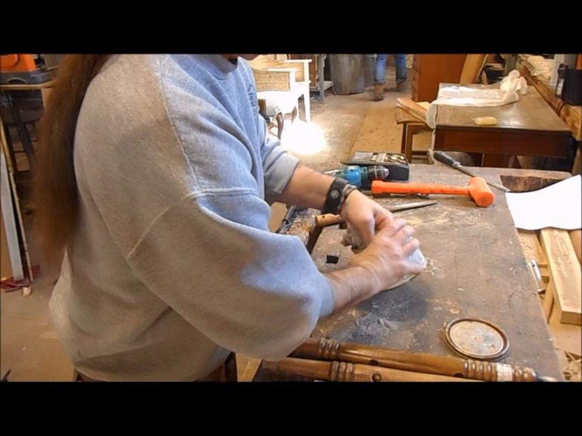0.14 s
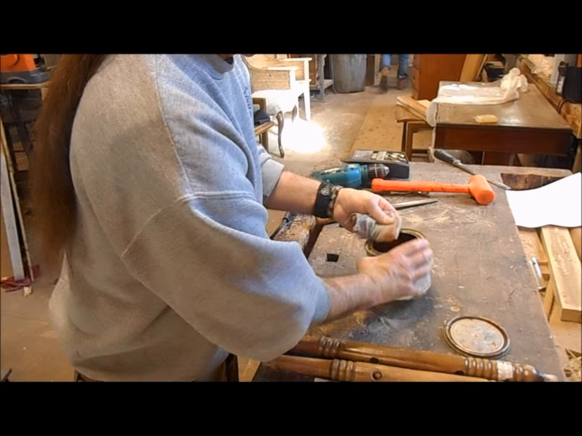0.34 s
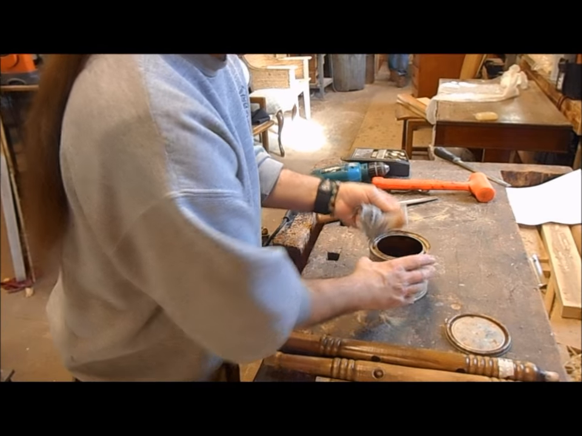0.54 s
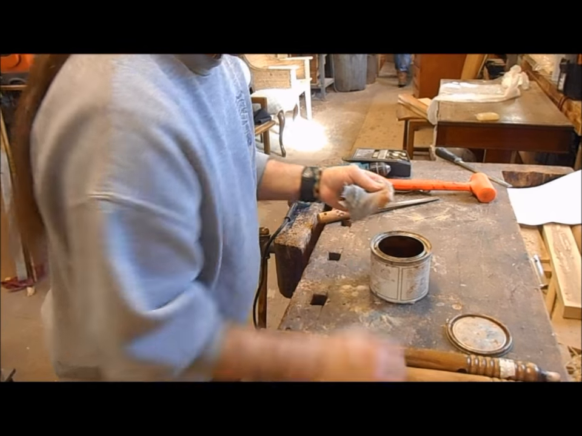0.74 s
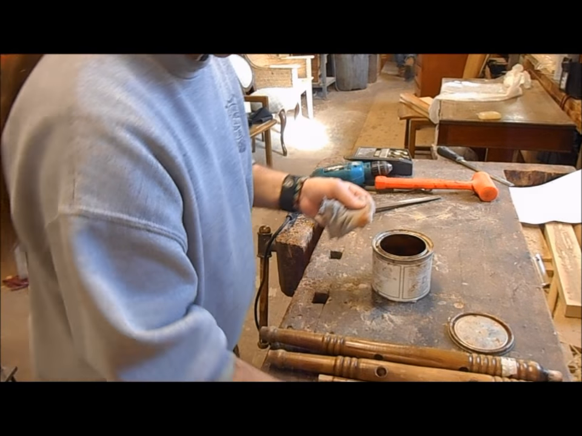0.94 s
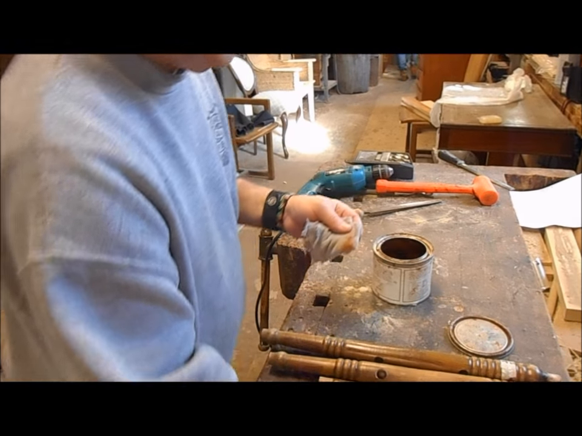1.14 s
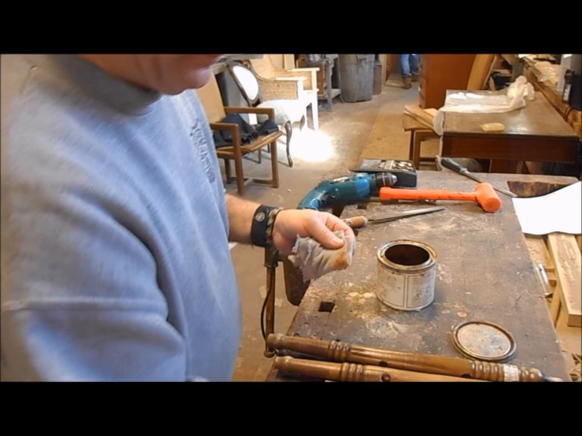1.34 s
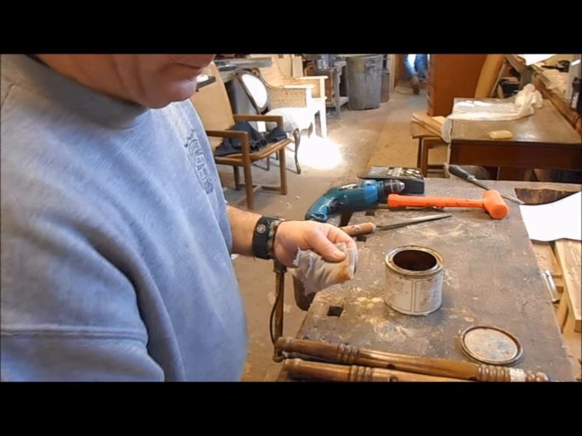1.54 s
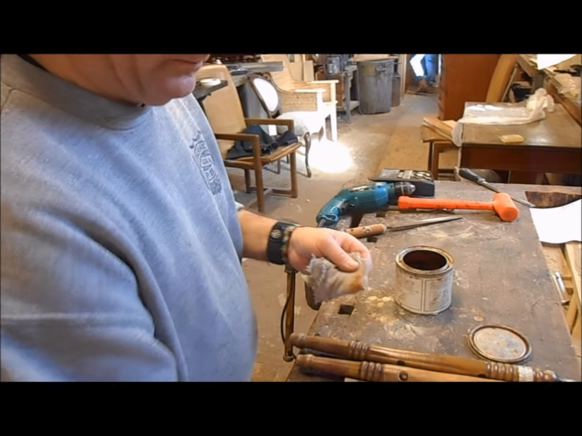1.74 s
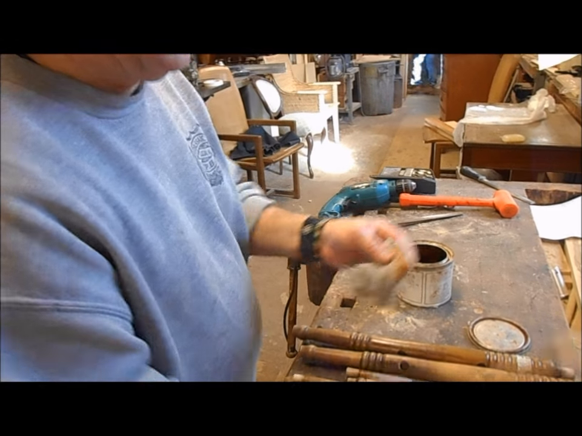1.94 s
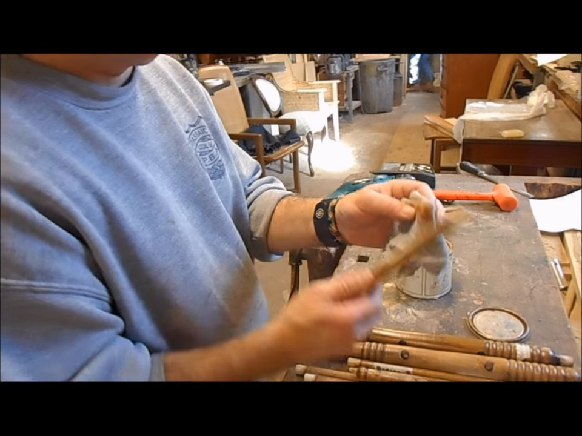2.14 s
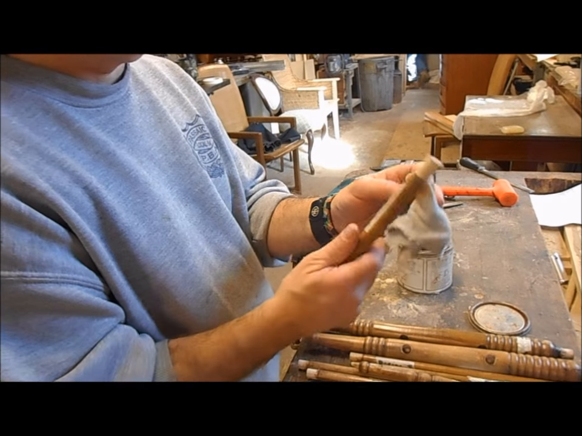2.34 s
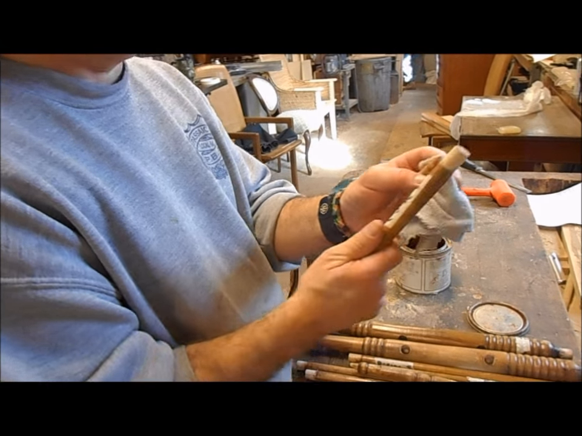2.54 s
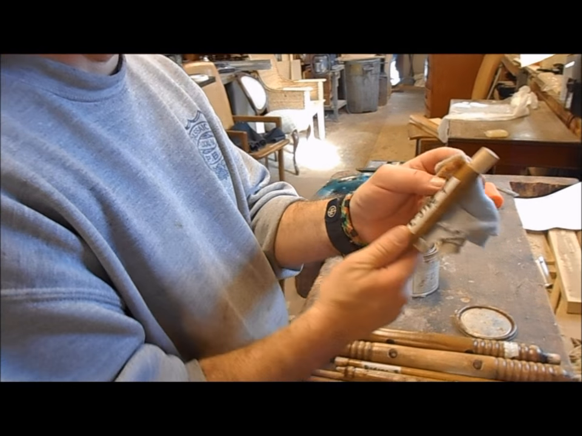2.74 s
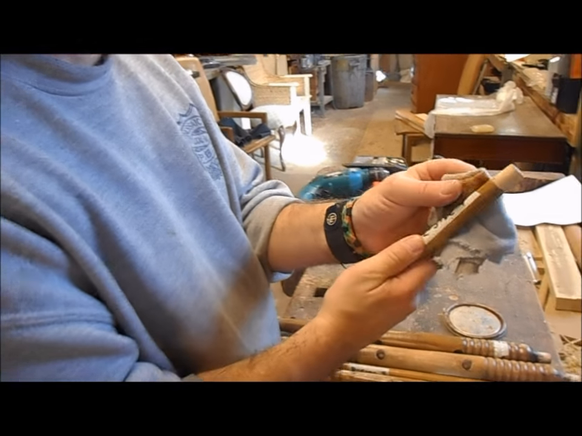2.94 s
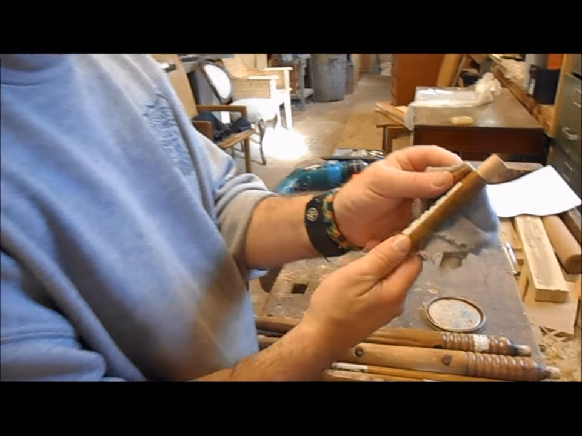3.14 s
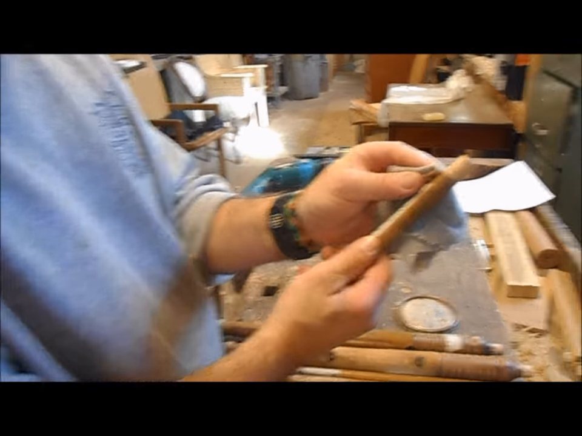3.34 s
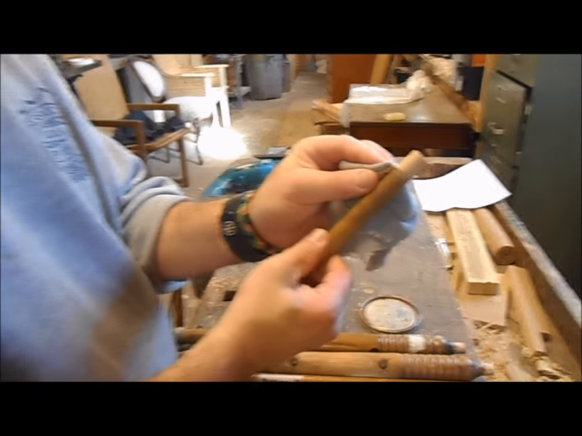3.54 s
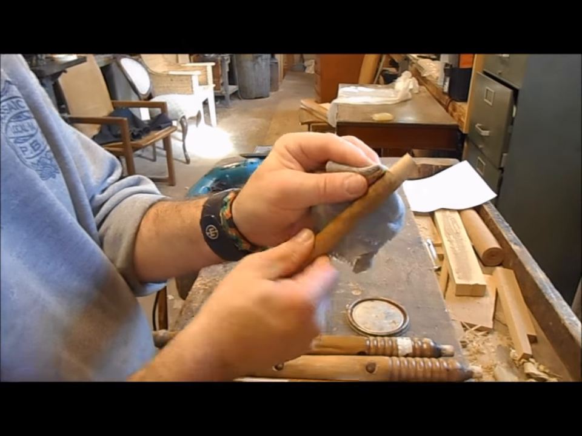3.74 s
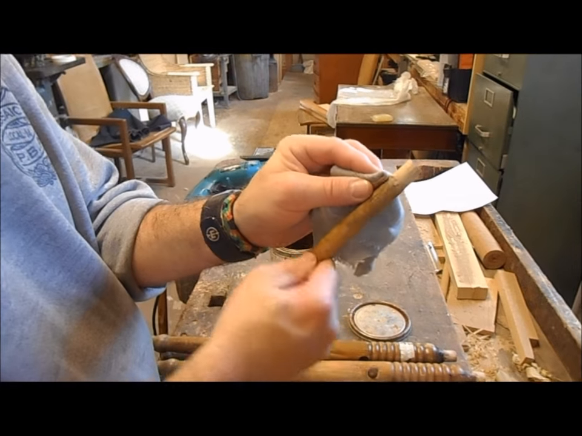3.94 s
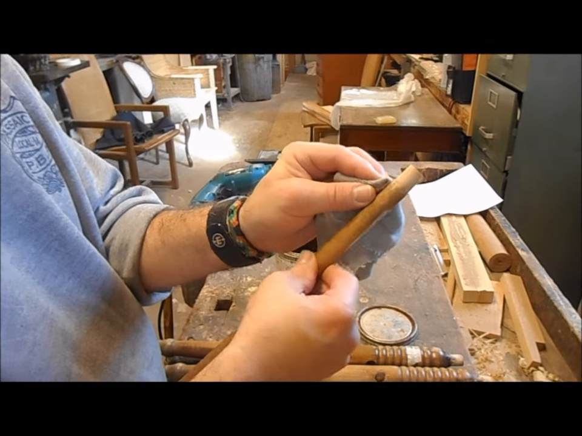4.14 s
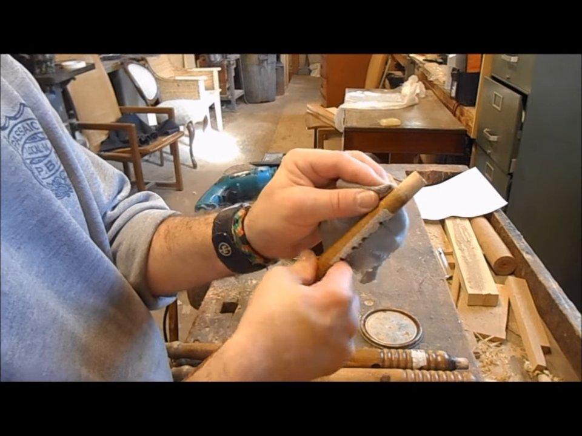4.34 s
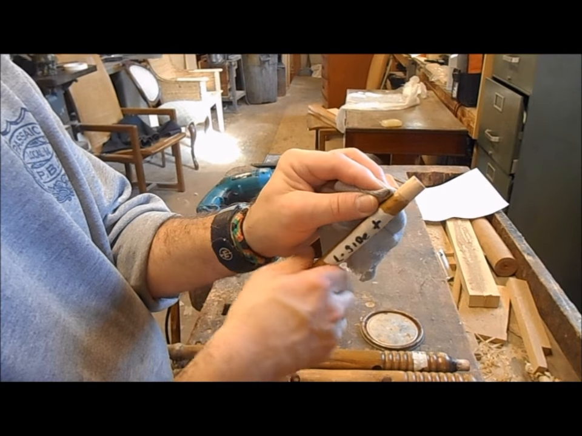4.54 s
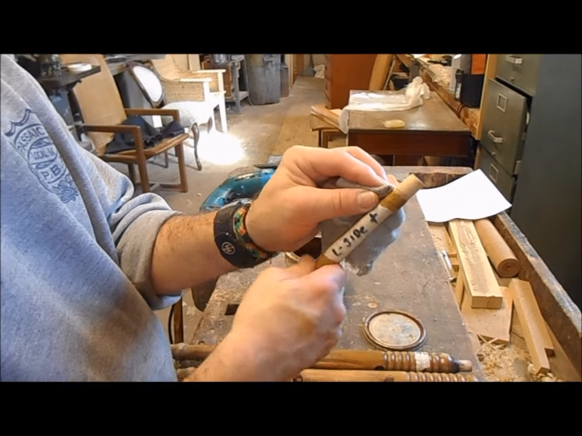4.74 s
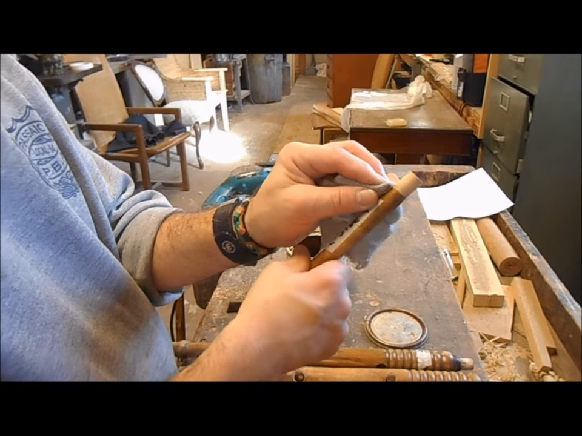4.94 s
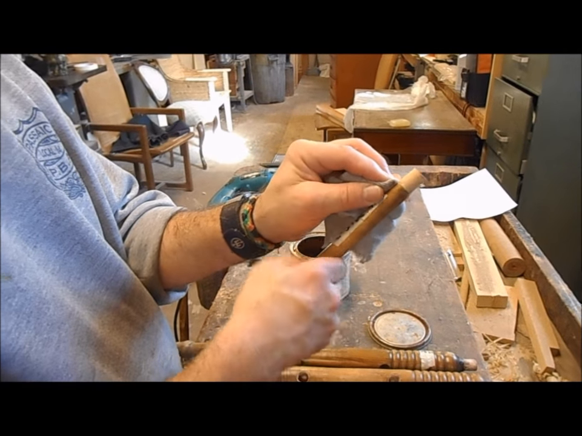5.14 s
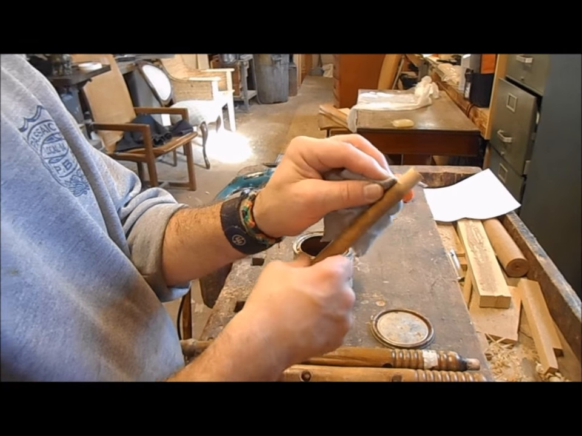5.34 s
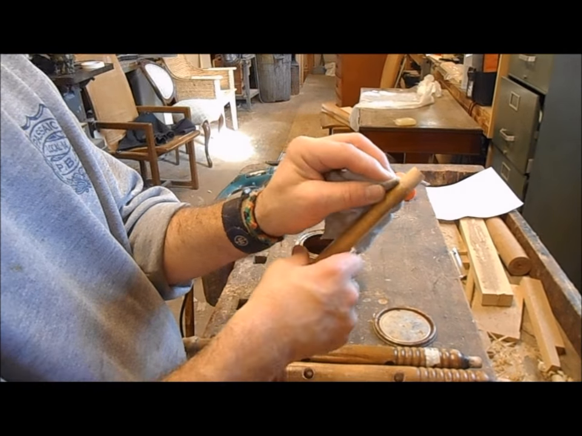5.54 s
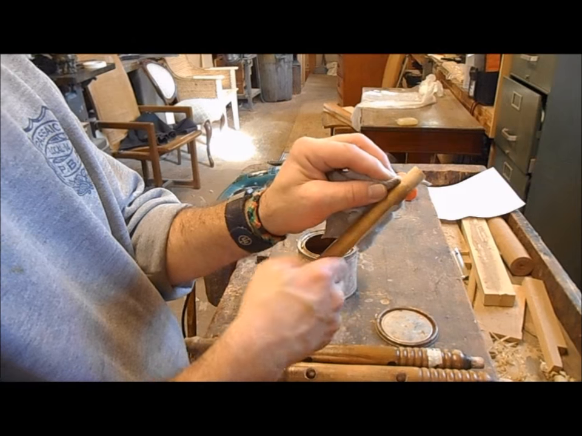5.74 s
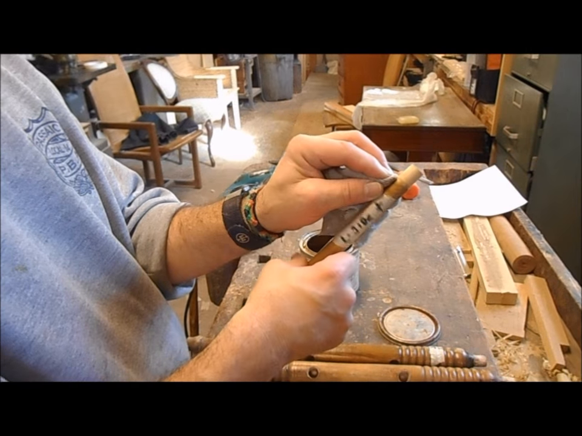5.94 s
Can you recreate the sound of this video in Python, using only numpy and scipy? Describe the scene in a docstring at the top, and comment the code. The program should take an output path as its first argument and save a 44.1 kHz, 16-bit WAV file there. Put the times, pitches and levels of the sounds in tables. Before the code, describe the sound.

A steady soft fan-like hiss with faint humming bands fills a small workshop with a short echo; the microphone is close. At 0 s there are dull scuffing bumps and faint cloth scratches, with a soft tin nudge at 0.3. At 0.42 a tin lands on the wooden bench with the loudest, hollow clunk and rocks until 0.6. Sharp distant ticks follow until 0.85. From 1.1 to 1.7 wooden parts slide, squeak and jolt in an uneven clatter, strongest at 1.55. Short cloth scrapes come at 1.7-1.9, then a bright, hard cluster of wood clacks at 2.0. Afterwards a waxy cloth rubs a spindle in quiet, short, dry scratchy strokes, with taps at 2.5 and 2.67, a thud at 2.87 and thin squeaks. Around 4.0-4.35 it catches and judders in rapid squeaks. From 4.65 to 5.75 muffled low thuds recur roughly every quarter second beneath the rubbing, which continues to 6 s.

```python
"""In a workshop a wax tin is set down and rocks on a wooden bench, wooden parts jolt, squeak and clack,
and a waxy cloth rubs a chair spindle in short scratchy strokes with catches and thin squeaks.
Tin and wood are struck modes or resonators; cloth is random slips through resonances.
Around them: fan-like hiss with humming bands (shaped noise), sharp taps far and near (noise bursts)
and dull thuds, like clothing or gear being bumped (filtered grit over a low boom)."""
import sys
import numpy as np
from scipy import signal
from scipy.fft import rfft, irfft, next_fast_len
from scipy.io import wavfile
from scipy.ndimage import uniform_filter1d

SR = 44100
rng = np.random.default_rng(int(sys.argv[2]) if len(sys.argv) > 2 else 0)


def wrap_up_sound(samples):
    """Save the sound to the file named by the first command line argument, as 16-bit audio."""
    columns = np.atleast_2d(samples).T
    # keep every value between -1 and 1, then stretch to whole-number steps
    tamed = np.clip(columns, -1, 1)
    steps = np.round(tamed * 32767).astype(np.int16)
    wavfile.write(sys.argv[1], SR, steps)


N = 263762
TIME_S = np.arange(N) / SR
RING_S = TIME_S[:SR // 2]  # time axis of one event

# Hiss spectrum. Each row: frequency in Hz, relative density in dB per Hz.
HISS_SPECTRUM = [(12, -36), (22, -2.5), (39, 7), (55, 0), (86, -16.5), (140, -3.5), (249, -16), (380, -16),
                 (480, -11.5), (736, -16.5), (1440, -13.5), (2200, -14.5), (3940, -19.5), (8540, -24),
                 (10500, -27.5), (13000, -105)]
# Humming bands. Each row: centre in Hz, width in Hz, level in dB.
HUM_BANDS = [(2197, 27, -65.5), (138.7, 53, -61.5)]
# Room decay. Each row: frequency in Hz, t60 in seconds.
ROOM_DECAY = [(100, 0.58), (700, 0.34), (2000, 0.22), (5000, 0.22), (10000, 0.11)]
# Dull thuds. Each row: start in seconds, scuff level in dB, brightness in Hz, decay in seconds,
# hollow ring in Hz, ring level in dB, low boom level in dB.
THUD_EVENTS = [(0.0, -42, 800, 0.034, 803, -41.5, -53), (0.09, -44, 547, 0.082, 157, -56.5, -63),
               (0.69, -50, 457, 0.029, 300, -57, -49), (0.86, -51.5, 660, .02, 600, -56.5, -55.5),
               (2.865, -44, 470, 0.043, 293, -54, -51), (3.54, -52.5, 710, 0.051, 200, -60, -68),
               (4.172, -54, 520, 0.029, 405, -44, -40), (4.671, -44.5, 1330, 0.044, 292, -48, -37),
               (4.917, -38, 1140, 0.05, 339, -38, -30), (5.149, -41.5, 900, 0.057, 244, -48, -37),
               (5.411, -38, 1130, 0.042, 317, -41, -46.5), (5.738, -41, 1620, 0.041, 254, -49, -58)]
# Thud contact spectrum. Each row: frequency in Hz, gain in dB.
THUD_SPECTRUM = [(50, 6.5), (100, -2), (170, -9.5), (250, 0), (340, -2), (480, -3), (700, -3), (1000, 1.5),
                 (2000, -1), (5000, 5)]
# Sharp taps, the first ones far, the last two near at the spindle. Each row: start in seconds,
# level in dB, lowest Hz, highest Hz, room level against the tap in dB.
TAP_EVENTS = [(0.6032, -33.5, 2830, 7700, 4.5), (0.7284, -37.5, 2700, 6700, 5.5),
              (0.8454, -48, 3000, 8000, -3), (2.4959, -39, 1300, 8300, 1.5),
              (2.6695, -34.5, 1100, 2740, -2)]
# Clacks: the tin rocking on the bench (first three rows), then wooden parts.
# Each row: start in seconds, level in dB, main ring in Hz, ring time factor.
CLACK_EVENTS = [(0.539, -29.5, 1016, 0.7), (0.5395, -34.5, 2690, .4), (0.583, -49, 1026, .5),
                (1.9901, -25, 2434, 0.59), (2.003, -30.5, 2425, 0.55), (2.0193, -22.5, 2398, 1),
                (2.0262, -31.5, 2406, 1.3)]
# Modes of a clack. Each row: multiple of the main ring, level in dB, t60 in seconds before the factor.
CLACK_MODES = [(1, 1, 0.025), (.89, -12.5, 0.12), (1.27, -15.5, 0.038), (1.54, -12, 0.028),
               (1.88, -9, .016), (3.0, -20.5, .012)]
# Jolts of shifted wood. Each row: start in seconds, level in dB, brightness in Hz,
# main ring in Hz, ring t60 in seconds.
JOLT_EVENTS = [(1.239, -30, 2300, 2145, 0.18), (1.253, -28.5, 1590, 2236, 0.061),
               (1.3338, -28.5, 4020, 1675, 0.27), (1.372, -34.5, 2440, 2220, 0.033),
               (1.4403, -31, 3500, 1580, 0.15), (1.457, -30, 2206, 1655, 0.046),
               (1.4693, -29.5, 4900, 4940, 0.037), (1.534, -33, 5000, 1640, 0.047),
               (1.5495, -22, 6500, 3010, 0.033), (1.56, -29, 3040, 1570, 0.049),
               (1.588, -30, 3000, 1570, 0.096), (1.627, -30, 6750, 1605, 0.091),
               (1.6548, -34, 2200, 920, .04)]
# Resonances of the shifted wood. Each row: centre in Hz, width in Hz, gain in dB.
WOOD_PEAKS = [(554, 81, -6.5), (916, 84, -3), (1250, 270, -11), (1587, 16, -1.5), (1673, 57, 2),
              (2190, 120, -3), (2530, 130, -14), (3103, 79, 0), (3914, 55, -3), (4066, 61, -1.5),
              (4980, 92, 1), (5400, 58, -8), (5780, 110, -6.5), (6370, 68, -2), (6900, 96, -5),
              (7240, 56, -18), (8800, 59, -5.5), (9100, 200, -17)]
# Tin nudged, landing and rocking. Each row: start in seconds, level in dB, brightness in Hz,
# ring time factor, rattle gain in dB.
TIN_CONTACTS = [(0.003, -35, 900, 0.3, -18), (0.3064, -36.5, 615, 2, 5), (0.418, -11.5, 6440, 1.02, -7.5),
                (0.4242, -17, 900, 1, -20), (0.4302, -18, 1400, 0.8, -17), (0.468, -25.5, 1200, 0.79, -15)]
# Modes of tin on bench. Each row: frequency in Hz, level in dB, t60 in seconds before the factor.
TIN_MODES = [(332, -8, 0.015), (373, -16.5, 0.12), (475, -21, 0.03), (649, -3.5, 0.092), (817, -8.5, 0.12),
             (958, -3, 0.094), (1093, -10, 0.048), (1160, -8, 0.091), (1456, -7, 0.046), (1666, 1.5, 0.028),
             (1722, -3.5, 0.033), (1870, -6, 0.034), (2030, -11, 0.044), (2180, -16, 0.052),
             (2480, -7, 0.02), (3070, -17, 0.026), (3710, -6, 0.017), (3710, -17, .025), (3930, -10, 0.02),
             (4630, -21.5, 0.029), (5790, -14.5, 0.039), (8140, -15, .02)]
# Strokes of the cloth. Each row: peak time in seconds, level in dB, swell in seconds, release in seconds.
STROKE_EVENTS = [(0.19, -48.5, 0.14, 0.18), (1.72, -45.5, 0.03, 0.029), (1.865, -44, 0.021, 0.14),
                 (2.14, -50.5, 0.15, 0.19), (2.344, -39.5, .05, 0.024), (2.47, -57, 0.095, 0.12),
                 (2.8, -46.5, 0.081, 0.04), (2.975, -48, .045, 0.032), (3.155, -45, 0.055, .024),
                 (3.43, -51.5, 0.093, 0.042), (3.59, -45.5, 0.021, 0.018), (3.715, -52.5, 0.022, 0.17),
                 (4.03, -48, 0.047, 0.075), (4.33, -45, 0.092, 0.12), (4.445, -44, 0.079, 0.0092),
                 (4.563, -52, 0.048, 0.024), (4.876, -48.5, 0.12, 0.029), (4.99, -58, .04, .06),
                 (5.19, -49.5, 0.1, 0.11), (5.35, -47, 0.031, 0.051), (5.61, -52.5, 0.13, 0.063),
                 (5.799, -46, .013, 0.091), (5.95, -45, 0.08, 0.038)]
# Pressure of the cloth. Each row: time in seconds, gain of the resonances in dB.
PRESSURE = [(0, 0), (1.8, -2.5), (3.3, 0), (4.0, 1.5), (4.45, -1), (5.0, 3), (5.98, -1)]
# Resonances excited by rubbing. Each row: centre in Hz, width in Hz, gain in dB.
RUB_PEAKS = [(1660, 190, -10.5), (2938, 96, 1.5), (3168, 67, 3.5), (4930, 60, 2.5), (5500, 77, -18),
             (6380, 41, -16), (6610, 110, -10), (6840, 200, -29), (8330, 100, -3), (9290, 140, -3.5),
             (9800, 110, -10)]
# Broad fizz of the weave. Each row: frequency in Hz, gain in dB.
WEAVE_SPECTRUM = [(300, -11), (1000, -9), (2000, -3), (4000, 3.5), (7000, 7), (9000, 4), (10500, -6)]
# Cloth catches on the wax and slips. Each row: start in seconds, level in dB, slip decay in seconds.
CATCH_EVENTS = [(0.017, -40.5, 0.0035), (0.09, -44.5, 0.0045), (0.225, -40.5, 0.0067), (0.3058, -39, 0.002),
                (0.5038, -42.5, 0.0031), (1.0682, -50, .002), (1.697, -39, 0.0035), (1.7226, -40.5, 0.0045),
                (1.7818, -40, 0.0043), (1.8334, -40.5, .005), (1.844, -36.5, 0.0063), (1.956, -41, 0.0067),
                (2.267, -41.5, .0035), (3.4536, -35, 0.0048), (3.468, -43.5, 0.01), (3.8241, -46.5, 0.003),
                (4.023, -34, .009), (4.0748, -41.5, 0.0068), (4.1006, -40, 0.0047), (4.1343, -40.5, .009),
                (4.1423, -42, 0.0063), (4.1731, -36, .007), (4.2204, -39.5, 0.0048), (4.452, -39.5, 0.0026),
                (4.669, -45.5, 0.0072), (5.247, -37.5, 0.0022), (5.3253, -41, .003), (5.336, -37.5, 0.0035),
                (5.4316, -38, 0.0018), (5.552, -41, 0.0022), (5.8242, -41.5, 0.0034)]
# Thin dry squeaks, of sliding wood (first three rows), then of the cloth.
# Each row: start in seconds, end in seconds, start Hz, end Hz, level in dB.
SQUEAK_EVENTS = [(1.261, 1.348, 6260, 6700, -51), (1.274, 1.384, 4970, 4400, -43.5),
                 (1.6, 1.633, 5870, 6000, -43), (2.086, 2.177, 4870, 4930, -54),
                 (2.297, 2.38, 7000, 6920, -50), (2.752, 2.842, 4660, 4600, -54),
                 (3.12, 3.184, 6950, 7130, -46.5)]
# Squeaks of the judder. Each row: frequency in Hz, level in dB.
JUDDER_TONES = [(3160, -48), (4920, -54.5)]

HISS_DB = -52
BOOM_HZ, BOOM_S, BOOM_UPPER_HZ, BOOM_UPPER_DB = 42, 0.16, 85.1, -10.5  # two modes
THUD_RISE_SHARE = 0.19  # rise time as a share of the decay
CRACK_DB, CRACK_S, CLACK_RISE_S = -7.5, 0.0086, 0.0011
JOLT_RING_DB, JOLT_DIRECT_DB = 1.5, -21.5  # ring against jolt level; bare blow against its resonances
JOLT_S, CHATTER_S, CHATTER_DB = 0.0015, 0.017, -15
PUSH_START_S, PUSH_END_S, PUSH_RISE_S, PUSH_FALL_S, PUSH_DB = 1.114, 1.71, 0.22, 0.076, -43.5
SKID_DB, SKID_S = -11, 0.033  # skid against its jolt
STROKE_SHAPE = 1.08  # 1 pointed, 2 round
FIZZ_DB, CATCH_FIZZ_DB = -11, -11.5  # gain of the weave's fizz
SNAGS_PER_S, SNAG_DB, SNAG_S = 11, 2, 0.0044  # level against the stroke
JUDDER_START_S, JUDDER_EVERY_S, JUDDER_LENGTH_S = 4.122, 0.048, 0.03
EDGE_HZ = 10850


def amp(db):
    """Decibels to gain."""
    return 10 ** (np.asarray(db) / 20)


def evened(x):
    """Scales to rms 1."""
    return x / np.sqrt(np.mean(x ** 2) + 1e-20)


def peaked(x, size=132):
    """Scales the loudest window of `size` samples (3 ms by default) to rms 1."""
    return x / np.sqrt(uniform_filter1d(x ** 2, size, mode="constant").max() + 1e-20)


def read(points, hz):
    """Interpolates a table on a log-frequency axis."""
    f_hz, value = np.transpose(points)
    return np.interp(np.log(hz + 1), np.log(f_hz + 1), value)


def add(mix, start_s, sound):
    """Mixes a sound in at a time."""
    part = mix[max(round(start_s * SR), 0):][:len(sound)]
    part += sound[:len(part)]


def coloured(x, points):
    """Gives x a smooth spectrum."""
    size = next_fast_len(len(x), True)
    gain = amp(read(points, np.fft.rfftfreq(size, 1 / SR)))
    return irfft(rfft(x, size) * gain, size)[:len(x)]


def cut(x, hz, kind="low", order=2):
    """Butterworth low-pass or high-pass."""
    sos = signal.butter(order, min(hz, SR / 2 - 1), kind, fs=SR, output="sos")
    return signal.sosfilt(sos, x)


def resonate(x, peaks):
    """Parallel resonances of alternating sign."""
    return sum((-1) ** k * amp(db) * signal.lfilter(*signal.iirpeak(hz, hz / width_hz, SR), x)
               for k, (hz, width_hz, db) in enumerate(peaks))


def whistle(x, hz, width_hz):
    """One resonance whose centre may glide: shift to 0 Hz, low-pass, shift back."""
    turn = np.exp(2j * np.pi * np.cumsum(hz * np.ones(len(x))) / SR)
    r = np.exp(-np.pi * width_hz / SR)
    return (turn * signal.lfilter([1 - r], [1, -r], x / turn)).real


def grains(per_s, spread_db):
    """Tiny random slips, most small and a few large."""
    size = amp(spread_db * np.minimum(rng.exponential(1, N), 4)) * rng.choice([-1, 1], N)
    return evened(size * (rng.random(N) < per_s / SR))


def clumps(depth_db, size):
    """Random swelling and fading of a contact: noise smoothed twice over `size` samples."""
    smooth = uniform_filter1d(uniform_filter1d(rng.standard_normal(N), size), size)
    return evened(amp(depth_db * evened(smooth)))


def burst(decay_s):
    """Dying shower of micro-contacts."""
    return rng.standard_normal(len(RING_S)) * np.exp(-RING_S / decay_s)


def gripped(x, peaks, depth_db, size):
    """A moving contact damps each resonance in turn and hands its share to the others."""
    shares = np.array([clumps(depth_db, size) for peak in peaks])
    shares /= np.sqrt(np.mean(shares ** 2, axis=0))
    return sum(share * resonate(x, [peak]) for share, peak in zip(shares, peaks))


def air():
    """Steady fan-like hiss, shaped noise, with humming bands of resonated noise."""
    hum = sum(amp(db) * evened(resonate(rng.standard_normal(N), [(hz, width_hz, 0)]))
              for hz, width_hz, db in HUM_BANDS)
    return hum + amp(HISS_DB) * evened(coloured(rng.standard_normal(N), HISS_SPECTRUM))


def room(x):
    """Dense random reflections from 4 ms on, each band dying at its own speed."""
    reflections = rng.standard_normal(len(RING_S)) * (rng.random(len(RING_S)) < 0.12) * (RING_S > 0.004)
    hz, t_s, bands = signal.stft(reflections, SR, nperseg=256)
    decay = amp(-60 * t_s / read(ROOM_DECAY, hz)[:, None])
    tail = signal.istft(bands * decay, SR, nperseg=256)[1]
    return signal.fftconvolve(x, tail / np.linalg.norm(tail))[:N]


def thuds():
    """Soft, scuffing bumps of filtered grit with a hollow ring, over a slow low boom."""
    out = np.zeros(N)
    boom_modes = np.sin(2 * np.pi * BOOM_HZ * RING_S)
    boom_modes += amp(BOOM_UPPER_DB) * np.sin(2 * np.pi * BOOM_UPPER_HZ * RING_S)
    boom = boom_modes * np.sin(np.pi * np.minimum(RING_S / BOOM_S, 1))
    for start_s, db, bright_hz, decay_s, hz, ring_db, boom_db in THUD_EVENTS:
        grit = rng.standard_normal(len(RING_S)) * (rng.random(len(RING_S)) < 1800 / SR)
        contact = coloured(grit, THUD_SPECTRUM)
        scuff = evened(cut(contact, bright_hz, order=3) + amp(-11.5) * cut(contact, 2250))
        hollow = whistle(whistle(rng.standard_normal(len(RING_S)), hz, 134), hz, 134)
        swell = (1 - np.exp(-RING_S / (THUD_RISE_SHARE * decay_s))) ** 2 * np.exp(-RING_S / decay_s)
        thud = amp(db) * scuff * swell / swell.max()
        thud += amp(ring_db) * peaked(hollow * swell, size=900)
        add(out, start_s, thud + amp(boom_db) * boom)
    return out


def taps():
    """Band-limited ticks, far and near, each carrying its own share of the room."""
    out = np.zeros(N)
    for start_s, db, low_hz, high_hz, room_db in TAP_EVENTS:
        tick = cut(cut(burst(0.002), low_hz, "high", order=3), high_hz)
        tick = amp(db) * peaked(tick)
        add(out, start_s, tick + amp(room_db) * room(tick)[:len(tick)])
    return out


def clacks():
    """Rocking tin, then wooden parts: a few modes and a crack; a lower factor damps the ring sooner."""
    out = np.zeros(N)
    for start_s, db, hz, sustain in CLACK_EVENTS:
        ring = sum(np.sin(2 * np.pi * hz * ratio * RING_S) * amp(mode_db - 60 * RING_S / (t60_s * sustain))
                   for ratio, mode_db, t60_s in CLACK_MODES)
        crack = cut(cut(burst(CRACK_S), 0.79 * hz), 0.5 * hz, "high")
        rise = 1 - np.exp(-RING_S / CLACK_RISE_S)
        add(out, start_s, amp(db) * peaked((ring + amp(CRACK_DB) * crack) * rise))
    return out


def sliding():
    """Strength of the wood's friction: one push, and a skid after each jolt."""
    ramp = np.minimum((TIME_S - PUSH_START_S) / PUSH_RISE_S, (PUSH_END_S - TIME_S) / PUSH_FALL_S)
    power = (amp(PUSH_DB) * np.clip(ramp, 0, 1)) ** 2
    for start_s, db, *_ in JOLT_EVENTS:
        add(power, start_s, (amp(db + SKID_DB) * np.exp(-RING_S / SKID_S)) ** 2)
    return np.sqrt(power)


def shifted_wood():
    """Wood slides and jolts over wood; each jolt favours one ring of the part that it hits."""
    friction = cut(grains(1500, 4.0) * clumps(3.2, size=300), 2060, order=1)
    ringing = gripped(friction, WOOD_PEAKS, 5.0, size=1500)
    out = sliding() * evened(ringing + amp(-12.5) * cut(friction, 220, "high"))
    for start_s, db, bright_hz, hz, t60_s in JOLT_EVENTS:
        blow = cut(burst(JOLT_S) + amp(CHATTER_DB) * burst(CHATTER_S), bright_hz)
        direct = amp(JOLT_DIRECT_DB) * cut(blow, 810, "high")
        ring = amp(JOLT_RING_DB - 60 * RING_S / t60_s) * np.sin(2 * np.pi * hz * RING_S)
        add(out, start_s, amp(db) * (ring + peaked(resonate(blow, WOOD_PEAKS) + direct)))
    return out


def tin():
    """Each contact rings modes of the tin on the bench, with a brief rattle, under a low-pass."""
    out = np.zeros(N)
    for start_s, db, bright_hz, sustain, rattle_db in TIN_CONTACTS:
        ring = sum((-1) ** k * amp(mode_db - 60 * RING_S / (t60_s * sustain)) * np.sin(2 * np.pi * hz * RING_S)
                   for k, (hz, mode_db, t60_s) in enumerate(TIN_MODES))
        rattle = cut(burst(0.0038) + amp(-1.5) * cut(burst(0.065), 2200), 500, "high")
        add(out, start_s, amp(db) * peaked(cut(ring + amp(rattle_db) * rattle, bright_hz, order=3)))
    return out


def judder(count):
    """The cloth sticks and squeaks at an even pace; gives rows like those of SQUEAK_EVENTS."""
    starts_s = JUDDER_START_S + JUDDER_EVERY_S * np.arange(count)
    return [(s, s + JUDDER_LENGTH_S, hz, hz, db) for s in starts_s for hz, db in JUDDER_TONES]


def squeaks():
    """Sliding wood, then rubbing cloth, squeaks in a narrow band of the friction, gliding or level."""
    out = np.zeros(N)
    for start_s, end_s, start_hz, end_hz, db in SQUEAK_EVENTS + judder(count=5):
        count = max(round((end_s - start_s) * SR), 64)
        hz = np.linspace(start_hz, end_hz, count)
        tone = whistle(whistle(rng.standard_normal(count), hz, 210), hz, 210)
        add(out, start_s, amp(db) * evened(tone) * signal.windows.tukey(count, 0.7))
    return out


def stroking():
    """Strength of the rubbing: every stroke swells and releases by the same law."""
    power = np.zeros(N)
    for peak_s, db, swell_s, release_s in STROKE_EVENTS:
        away = np.maximum((peak_s - TIME_S) / swell_s, (TIME_S - peak_s) / release_s)
        near = away < 6
        power[near] += (amp(db) * np.exp(-abs(away[near]) ** STROKE_SHAPE)) ** 2
    return np.sqrt(power)


def scratched(slip):
    """A slip rings the rubbing resonances, with a little fizz of the weave."""
    return resonate(slip, RUB_PEAKS) + amp(CATCH_FIZZ_DB) * coloured(slip, WEAVE_SPECTRUM)


def cloth():
    """Fibres slip over waxed wood: fine grains under the stroke, sudden catches, random snags."""
    stroke = stroking()
    slips = grains(6000, 3.8) * clumps(2.0, size=160)
    pressure = amp(np.interp(TIME_S, *np.transpose(PRESSURE)))
    ringing = pressure * gripped(slips, RUB_PEAKS, 6.5, size=2400)
    out = stroke * evened(ringing + amp(FIZZ_DB) * coloured(slips, WEAVE_SPECTRUM))
    for start_s, db, decay_s in CATCH_EVENTS:
        add(out, start_s, amp(db) * peaked(scratched(burst(decay_s))))
    snag_starts = (rng.random(N) < SNAGS_PER_S / SR) + 1e-12
    snags = signal.lfilter([1], [1, -np.exp(-1 / (SNAG_S * SR))], snag_starts)
    out += amp(SNAG_DB) * stroke * snags * evened(scratched(rng.standard_normal(N)))
    return cut(out, 10900, order=6)


def scene():
    """Sounds at the bench are nearly dry; the taps bring their own share of the room."""
    bumps, knocks = thuds(), shifted_wood() + clacks()
    can, rub = tin(), cloth() + squeaks()
    wet = room(amp(-17) * can + amp(-10.5) * knocks + amp(-12.5) * rub + amp(-11.5) * bumps)
    return (air() + wet + bumps + taps() + knocks + can + rub)[None]


def record(dry):
    """Steep linear-phase low-pass: the recorder's band limit."""
    return signal.oaconvolve(dry, signal.firwin(301, EDGE_HZ, window=("kaiser", 7), fs=SR)[None], "same")


dry = scene()
out = record(dry)
wrap_up_sound(out)
```